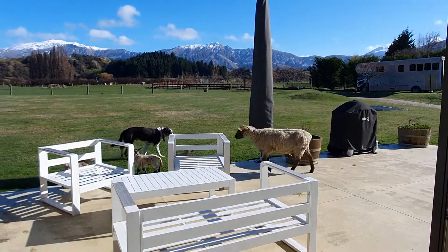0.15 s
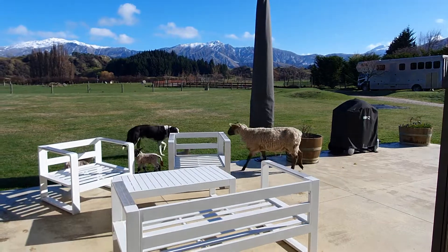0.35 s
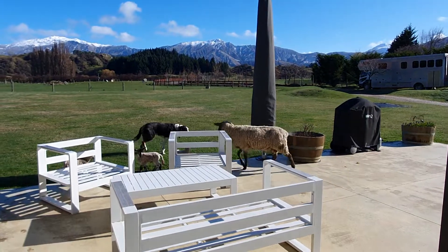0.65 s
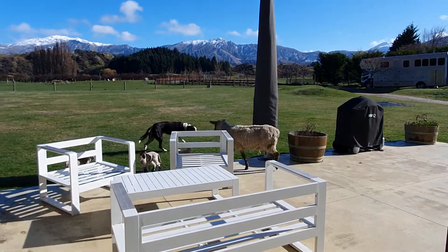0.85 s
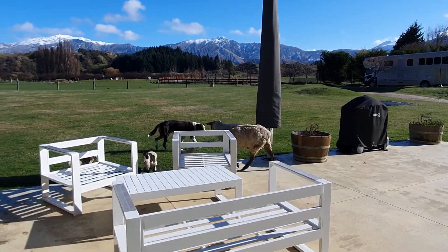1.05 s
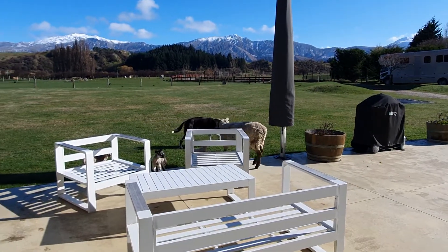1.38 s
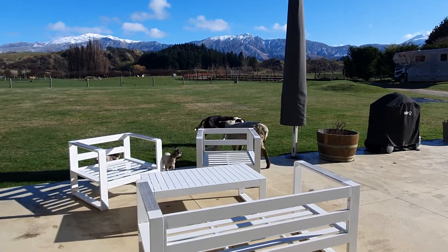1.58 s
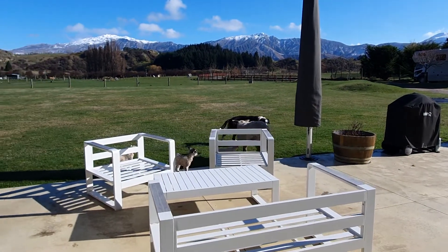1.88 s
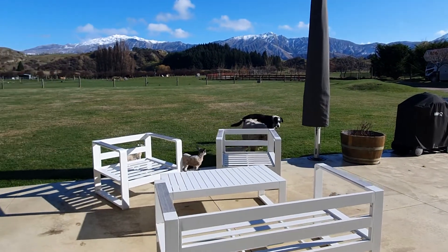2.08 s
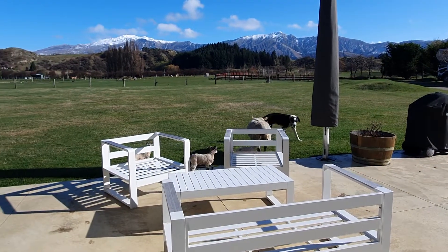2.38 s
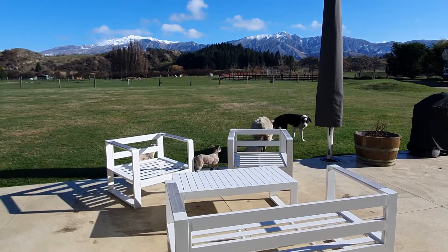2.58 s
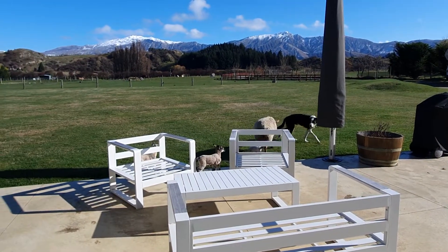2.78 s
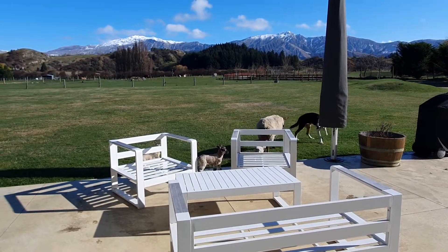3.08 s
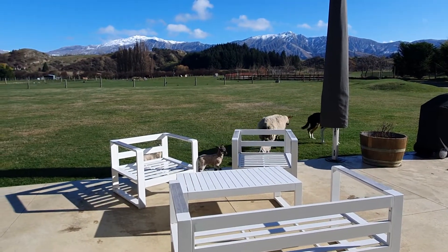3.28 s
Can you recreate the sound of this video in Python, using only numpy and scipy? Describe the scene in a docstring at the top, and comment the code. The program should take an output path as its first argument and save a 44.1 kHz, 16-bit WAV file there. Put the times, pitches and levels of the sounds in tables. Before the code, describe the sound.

A sheep bleats once, from about 1.3 to 2.0 seconds: a rough start, a nasal held note quavering around 350 hertz, then a sharp bright flare near 1.9 and a quick drop, with short patio reflections. Faint hiss swells into it. Distant birds chirp thinly at 0.3-1.1 and after 2.2 seconds. Low rumble continues throughout, with tiny handling ticks and soft bumps.

```python
"""A sheep gives one quavering bleat beside a farmhouse patio: a hoarse start, a clear held note, a bright flare.
Pulses and rasp from the vocal folds pass through moving throat and mouth resonances.
The paving and the house wall answer with short noise tails. Distant birds are gliding bands of noise.
Shaped noise also makes the low rumble, the faint air, a hiss that swells up to the bleat,
and a few small handling ticks and bumps."""
import sys
import numpy as np
from scipy import signal
from scipy.fft import rfft, irfft, next_fast_len
from scipy.io import wavfile
from scipy.ndimage import map_coordinates

SR = 44100
rng = np.random.default_rng(int(sys.argv[2]) if len(sys.argv) > 2 else 0)


def store_pcm(level_fs):
    """Save levels as 16-bit WAV."""
    pcm = np.round(np.clip(level_fs, -1, 1) * 32767).astype(np.int16)
    wavfile.write(sys.argv[1], SR, np.atleast_2d(pcm).T)


N = 152145  # length in samples


def amp(db):
    """Turn decibels into a gain."""
    return 10 ** (np.asarray(db) / 20)


def unit(x):
    """Scale to an rms of 1."""
    return x / np.sqrt(np.mean(x ** 2) + 1e-20)


def along(points, hz):
    """Read a (Hz, value) table at hz, with straight lines on a log frequency axis."""
    f, v = np.transpose(points)
    return np.interp(np.log(hz + 1), np.log(f + 1), v)


def curves(rows, t):
    """Read each column after the time column at times t."""
    s, *cols = np.transpose(rows)
    return [np.interp(t, s, c) for c in cols]


def wobble(rate):
    """A smooth random curve through `rate` random points a second."""
    points = rng.standard_normal(int(N * rate / SR) + 4)
    return map_coordinates(points, [np.arange(N) * rate / SR])


def filtered(x, response):
    """Filter x by a response given as a function of frequency."""
    m = next_fast_len(N + SR // 2)
    spectrum = rfft(x, m) * response(np.fft.rfftfreq(m, 1 / SR))
    return irfft(spectrum, m)[..., :N]


def gate(t, start, end, fade):
    """Open between start and end, with straight fades."""
    return np.clip(np.minimum(t - start, end - t) / fade, 0, 1)


def rush(spectrum, side_db):
    """Coloured stereo noise of rms 1; side_db sets how much the two sides differ."""
    noise = rng.standard_normal((2, N))
    mid, side = filtered(noise, lambda hz: amp(along(spectrum, hz)))
    return unit(mid + amp(side_db) * np.array([side, -side]))


def background(t):
    """A wavering, near-mono low rumble under faint, wide open-air noise."""
    # Colour of the rumble. Each row: frequency in Hz, relative level in dB.
    rumble_colour = [(18,-44.5),(25,-25),(33,-10.5),(45,-4.5),(62,-7.5),(82,5),(97,-4.5),(115,-4),(145,-17.5),(175,-22.5),(220,-22),(300,-35),(420,-43.5),(880,-83)]
    # Slow course of the rumble. Each row: time in seconds, level in dB before the trim and wavering.
    rumble_level = [(0.0, -66), (0.09, -57), (1.21, -57), (1.52, -52.5), (3.18, -54), (3.45, -54)]
    # Colour of the open air. Each row: frequency in Hz, relative level in dB.
    air_colour = [(180, -17), (300, 0), (391, -9.5), (744, -8.5), (808, -9.5), (1120, -16.5), (1910, -20),
                  (5130, -19), (7250, -29.5), (11700, -27), (15500, -28.5)]
    # Slow swell of the air. Each row: time in seconds, change in dB.
    air_swell = [(0,-2.5),(.5,-2.5),(1.1,1.5),(2.1,3.5),(2.7,-1),(3.4,-0.5)]
    rumble_trim_db, air_db = 1.5, -75
    rumble_db = curves(rumble_level, t)[0] + rumble_trim_db + 2.33 * wobble(8.3)
    rumble = amp(rumble_db) * rush(rumble_colour, side_db=-19)
    air = amp(air_db + curves(air_swell, t)[0]) * rush(air_colour, side_db=-0.5)
    left_right = amp([[-1.3], [1.3]])  # the rumble leans to the right
    return rumble * left_right + air


def hiss(t):
    """Broad, faint noise that rises towards the bleat and fades under it."""
    # Colour of the hiss. Each row: frequency in Hz, relative level in dB.
    hiss_colour = [(1500,-39),(3000,-6.5),(4500,0),(6500,-5.5),(9000,-14),(12000,-10.5),(15500,-20)]
    peak_db, peak_s = -59.5, 1.383
    rise_db_per_s, fall_db_per_s = 37.5, 32
    rising = rise_db_per_s * (t - peak_s)
    falling = fall_db_per_s * (peak_s - t)
    return amp(peak_db + np.minimum(rising, falling)) * rush(hiss_colour, side_db=0)


def bumps(t):
    """Dull puffs of handling noise, each a band of noise that swells and fades smoothly."""
    # Each row: time in seconds, level in dB, centre frequency in Hz, half length in seconds.
    puffs = [(2.098,-69.5,1545,0.0035),(2.382,-74.5,646,0.018),(2.848,-67.5,331,0.026)]
    out = 0
    for s, db, hz, half in puffs:
        colour = [(hz / 4, -40), (hz, 0), (hz * 2, -16), (hz * 4, -60)]
        swell = np.exp(-((t - s) / half) ** 2)
        out = out + amp(db) * swell * rush(colour, side_db=-9)
    return out


def ticks(t):
    """Short bright scuffs near the microphone: noise that starts at once and dies away."""
    # Each row: time in seconds, rough peak level in dB.
    scuffs = [(.18,-55),(.283,-66.5),(.64,-71),(.94,-62),(2.24,-68),(2.372,-64.5),(2.549,-67),(2.591,-72)]
    # Colour of the scuffs. Each row: frequency in Hz, relative level in dB.
    scuff_colour = [(1000,-15),(5000,-85),(8000,9.5),(11000,21),(15000,8)]
    t60_s = 0.13  # time to fall 60 dB
    level = 0
    for s, db in scuffs:
        # the noise's rms starts 12 dB under its peaks
        level = level + amp(db - 12 - 60 * np.abs(t - s) / t60_s) * (t >= s)
    return level * rush(scuff_colour, side_db=0.5)


def birds(t):
    """Thin gliding notes, blurred into narrow noise by distance."""
    # Each row: start in seconds, length in seconds, start pitch in Hz, end pitch in Hz,
    # width of the blur in Hz, level in dB before the trim.
    notes = [(0.04,0.12,3380,3400,25.3,-88),(.32,0.12,3920,5000,500,-83),(0.413,0.094,3165,3035,353,-72.5),(0.418,0.097,4230,5800,930,-73.5),(0.486,.07,4420,4250,250,-71.5),(.53,0.096,3604,3830,81,-70.5),(0.568,0.14,4160,4240,149,-68.5),(0.616,0.081,6070,5470,600,-76.5),(0.626,0.15,2707,3500,89,-71),(0.698,.1,3500,4170,198,-70.5),(0.786,0.031,6400,6330,295,-79),(.815,0.053,5270,5430,600,-69),(0.871,0.086,4330,4360,625,-68.5),(0.993,.06,5040,5570,352,-74.5),(1.037,0.087,3840,4150,393,-77),(2.175,.09,5190,5300,385,-71),(2.247,0.093,4300,3810,455,-71),(2.344,0.05,2600,2225,50.3,-71.5),(2.358,0.054,5300,5150,450,-70.5),(2.442,0.042,4700,4730,250,-76),(2.45,0.075,2420,2340,47.7,-77.5),(2.518,0.1,5020,5540,450,-72),(2.686,0.094,5200,5200,397,-80.5),(2.664,0.27,3530,3550,70.6,-85.5),(2.918,0.07,5200,5600,500,-77),(2.994,0.15,4950,5140,554,-73),(3.108,0.12,4120,4165,354,-74.5),(3.191,0.084,5070,5100,245,-77.5),(3.122,.11,2214,2060,60,-88),(3.297,0.073,4200,4270,252,-82.5)]
    trim_db, haze_db, haze_hz = -3, -7, 1400  # the haze is a wider blur around each note
    window = SR // 2  # each note is built in half a second
    hz = np.fft.fftfreq(window, 1 / SR)
    haze = amp(haze_db) * unit(np.exp(-(hz / haze_hz) ** 2))
    out = np.zeros((2, N))
    for start, length, from_hz, to_hz, width, db in notes:
        blur = unit(np.exp(-(hz / width) ** 2)) + haze
        noise = rng.standard_normal((2, window, 2)) @ [1, 1j]
        mid, side = np.fft.ifft(np.fft.fft(noise) * blur)
        stereo = mid + np.array([side, -side])
        u = np.clip(t[:window] / length, 0, 1)  # progress through the note
        glide = np.exp(2j * np.pi * np.cumsum(from_hz + (to_hz - from_hz) * u) / SR)
        swell = np.abs(np.sin(np.pi * u)) ** 0.44
        flicker = amp(2.1 * wobble(108.4)[:window])
        note = (stereo * glide).real * swell * flicker
        i = max(round(start * SR), 0)
        out[:, i:i + window] += amp(db + trim_db) * note[:, :N - i]
    return out


def echo(x, decay):
    """Spread x into a stereo tail of noise that dies away at its own speed at each frequency."""
    noise = rng.standard_normal((2, SR // 2))
    hz, s, z = signal.stft(noise, SR, nperseg=256)
    fade = amp(-60 * s / along(decay, hz)[:, None])
    tail = signal.istft(z * fade, SR, nperseg=256)[1]
    return signal.fftconvolve(x[None], tail / np.linalg.norm(tail[0]), axes=1)[:, :N]


def microphones(hz):
    """The left and right microphones hear the bleat with different levels and phases."""
    # Each row: frequency in Hz, left minus right in dB.
    balance = [(250,4),(360,0.5),(720,5.5),(1100,-4),(1800,2),(2900,-1),(4200,-5.5),(6400,-7),(10000,1.5)]
    # Each row: frequency in Hz, phase in radians by which left leads.
    lead = [(250,0.38),(360,0.61),(720,1.23),(1100,1.8),(1400,1.7),(2100,1.2),(2900,0.704),(3800,2.23),(5000,1.1),(7000,1.36),(12000,1.7)]
    half = np.array([[.5], [-.5]])
    return amp(half * along(balance, hz)) * np.exp(1j * half * along(lead, hz))


def pulses(pitch, count):
    """A train of equal harmonics, each pulse smeared over its cycle, and its phase."""
    spread = .13  # radians per harmonic number squared
    phase = 2 * np.pi * np.cumsum(pitch) / SR
    harmonics = (np.cos(k * phase - spread * k * k) for k in range(1, count + 1))
    return unit(sum(harmonics)), phase


def folds(t):
    """Vocal fold pulses; roughness shakes pitch and level and adds rasp, mostly in the treble."""
    # The bleat's pitch before the final sag and shaking. Each row: time in seconds, pitch in Hz.
    pitch_path = [(1.27, 299), (1.282, 316.2), (1.31, 315.9), (1.334, 308.8), (1.38, 354.3), (1.4, 345.7),
                  (1.41, 335.2), (1.436, 352), (1.46, 367.5), (1.488, 351), (1.51, 349.8), (1.554, 374),
                  (1.58, 346.8), (1.64, 363.5), (1.676, 358.9), (1.698, 368.6), (1.716, 360.1),
                  (1.738, 360.5), (1.756, 346.1), (1.79, 358), (1.806, 348.5), (1.838, 362), (1.864, 360),
                  (1.872, 367.3), (1.905, 341.1)]
    # Hoarseness. Each row: time in seconds, roughness from 0 to 1.
    roughness = [(1.28,0.68),(1.335,0.83),(1.38,0),(1.41,0.47),(1.46,0.06),(1.5,.35),(1.545,0.05),(1.57,0.48),(1.62,0.03),(1.72,0.11),(1.76,0.22),(1.8,0.12),(1.86,0.09),(1.91,0.22),(1.94,0.69)]
    sag_start_s, sag_hz_per_s, sag_most_hz = 1.915, 2300, 62.6
    jitter, shimmer_db = .026, 3.5  # pitch and level shaking at full roughness
    low_rasp, high_rasp = .55, 0.72  # rasp's share of the power at full roughness
    second_ratio, second_db = .868, -8.5  # a second, lower note inside the voice
    second_start_s, second_end_s = 1.46, 1.78

    # the pitch drops as the breath runs out
    sag = np.clip(sag_hz_per_s * (t - sag_start_s), 0, sag_most_hz)
    rough = np.clip(curves(roughness, t)[0], 0, 1)
    shake = jitter * rough * wobble(260) + 0.0048 * wobble(70)
    pitch = (curves(pitch_path, t)[0] - sag) * (1 + shake)
    buzz, phase = pulses(pitch, count=44)

    # the rasp swells once a cycle
    rasp = unit(rng.standard_normal(N) * (1 + 1.1 * np.cos(phase)))
    shimmer = amp(shimmer_db * rough * wobble(220))
    shares = np.clip([low_rasp * rough, high_rasp * rough], 0, 1)
    low, high = (np.sqrt(1 - shares) * buzz + np.sqrt(shares) * rasp) * shimmer

    second_pitch = second_ratio * pitch * (1 + 0.0185 * wobble(200))
    second = pulses(second_pitch, count=44)[0]
    second = amp(second_db) * second * gate(t, second_start_s, second_end_s, 0.055)
    return low, high, second


def shaped(x, colour_db):
    """Give x a moving colour(hz, s); single overtones swell and fade by a smooth random field."""
    flutter_db = 1.6
    hz, s, z = signal.stft(x, SR, nperseg=256, noverlap=192)
    smoothing = np.outer(np.hanning(5), np.hanning(64))
    field = signal.fftconvolve(rng.standard_normal(z.shape), smoothing, mode="same")
    gain = amp(colour_db(hz[:, None], s) + flutter_db * unit(field))
    gain = gain / np.sqrt(np.mean(gain ** 2, axis=0))  # colour alone sets no overall level
    return signal.istft(z * gain, SR, nperseg=256, noverlap=192)[1][:N]


def throat(hz, s):
    """The low voice: a throat resonance sinks, and the fundamental weakens late in the call."""
    # Each row: time in seconds, resonance in Hz.
    resonance = [(1.3,1900),(1.46,1980),(1.56,1850),(1.7,1750),(1.8,1450),(1.87,1250)]
    # Steady colour of the low voice. Each row: frequency in Hz, relative level in dB.
    chest = [(120,-18),(230,12),(340,2.5),(500,-8),(720,-1),(1080,-8),(1450,-6),(1850,-6),(2200,-7),(2600,-22),(3400,-44)]
    peak_db, width_hz = 6, 280
    thin_s, thin_db, thin_below_hz = 1.9, -6, 480
    peak = peak_db / (1 + ((hz - curves(resonance, s)[0]) / width_hz) ** 2)
    thinning = np.clip((s - thin_s) / 0.027 + .5, 0, 1) * (hz < thin_below_hz)
    return along(chest, hz) + peak + thin_db * thinning


def mouth(hz, s):
    """Two mouth resonances sink, then rise at the end; the treble snaps open into the flare."""
    # Each row: time in seconds, main resonance in Hz, upper resonance in Hz.
    resonances = [(1.28,3940,7600),(1.32,4590,7500),(1.39,3780,7050),(1.46,3150,6950),(1.56,3220,6900),(1.63,3020,6750),(1.72,2930,6650),(1.875,2700,6500),(1.91,3050,6800),(1.925,3490,7200),(1.95,4660,7400)]
    # Colour of the treble until the flare. Each row: frequency in Hz, relative level in dB.
    treble = [(1500,-60),(2100,-14),(2500,-3.5),(3500,1.5),(4200,-5),(4900,-3.5),(5500,-13.5),(6000,-17.5),(6800,-20),(7700,-22),(9000,-37),(10300,-24),(11800,-13),(13500,-30),(15500,-67)]
    # Colour of the final flare. Each row: frequency in Hz, relative level in dB.
    flare_colour = [(1500,-67),(2200,-52),(2550,-7.5),(2900,1),(3400,-2.5),(4000,3.5),(4550,-2.5),(5000,-15),(5500,-13),(6200,-26.5),(7500,-23.5),(9500,-29),(12000,-31),(15500,-32)]
    main_db, main_width_hz = 13.5, 420
    upper_db, upper_width_hz = 15.5, 230
    flare_s, flare_rise_s = 1.872, .003
    main, upper = curves(resonances, s)
    main_peak = main_db / (1 + ((hz - main) / main_width_hz) ** 2)
    upper_peak = upper_db / (1 + ((hz - upper) / upper_width_hz) ** 2)
    held = along(treble, hz) + upper_peak
    flare = np.clip((s - flare_s) / flare_rise_s + .5, 0, 1)
    return main_peak + (1 - flare) * held + flare * along(flare_colour, hz)


def sheep(t):
    """The folds sound through the throat and the moving mouth, each part with its own loudness."""
    # Each row: time in seconds, low voice level in dB, treble level in dB before its trim.
    effort = [(1.265, -59, -63), (1.283, -55.5, -50.5), (1.337, -58, -61), (1.381, -46, -43),
              (1.399, -48.5, -49.5), (1.413, -54, -52.5), (1.445, -44, -43.5), (1.509, -51, -48.5),
              (1.557, -45, -41), (1.603, -49, -46.5), (1.617, -50, -41), (1.679, -47, -47.5),
              (1.735, -48.5, -44), (1.761, -50, -49), (1.783, -54, -50), (1.821, -47.5, -49),
              (1.835, -50, -47.5), (1.863, -49.5, -67), (1.877, -48, -34.5), (1.905, -46.5, -39.5),
              (1.931, -57.5, -42), (1.975, -66, -74.5), (2.0, -52, -57)]
    treble_trim_db = 1
    start_s, end_s, fade_s = 1.264, 1.99, .014
    low, high, second = folds(t)
    low_db, high_db = curves(effort, t)
    low = unit(shaped(low + second, throat))
    high = unit(shaped(high + amp(-16) * second, mouth))
    voice = amp(low_db) * low + amp(high_db + treble_trim_db) * high
    return voice * gate(t, start_s, end_s, fade_s)


def scene():
    """The bleat with its reflections, over the birds, the small noises and the background."""
    # How long the yard rings. Each row: frequency in Hz, time in seconds to fall 60 dB.
    yard = [(200,0.47),(1000,0.25),(4000,0.22),(12000,0.067)]
    yard_db, patio_db, patio_t60_s = -9, -4, 0.051
    bird_echo_db, bird_t60_s = -8, .25
    t = np.arange(N) / SR
    bleat, song = sheep(t), birds(t)
    patio_echo = amp(patio_db) * echo(bleat, [(1000, patio_t60_s)])
    yard_echo = amp(yard_db) * echo(bleat, yard)
    song = song + amp(bird_echo_db) * echo(song[0], [(1000, bird_t60_s)])
    voice = filtered(bleat, microphones) + patio_echo + yard_echo
    return voice + song + hiss(t) + bumps(t) + ticks(t) + background(t)


def record(dry):
    """Nothing is kept above the band limit."""
    top_hz = 15720
    return filtered(dry, lambda hz: hz < top_hz)


dry = scene()
out = record(dry)
store_pcm(out)
```